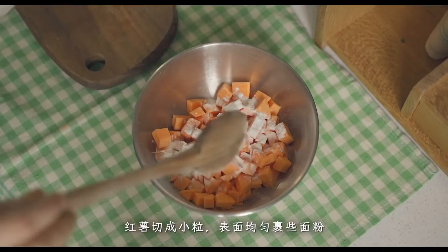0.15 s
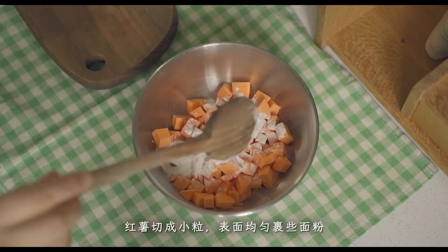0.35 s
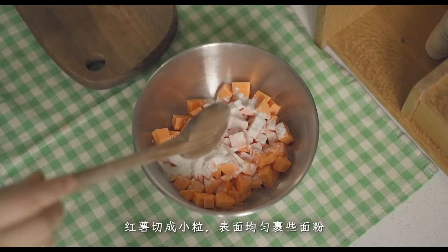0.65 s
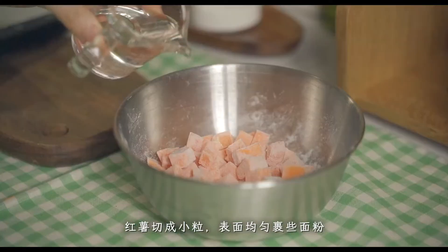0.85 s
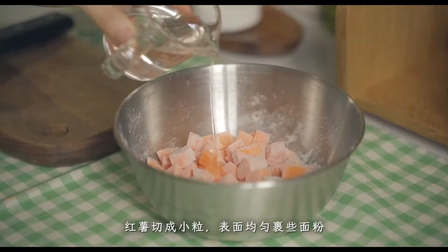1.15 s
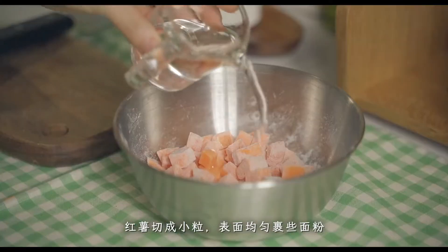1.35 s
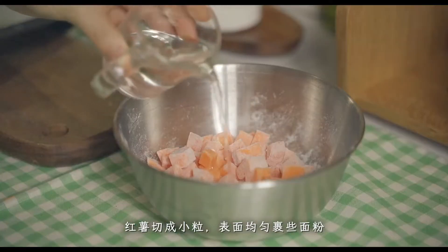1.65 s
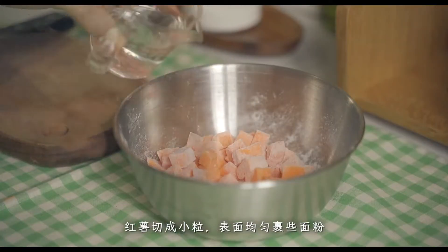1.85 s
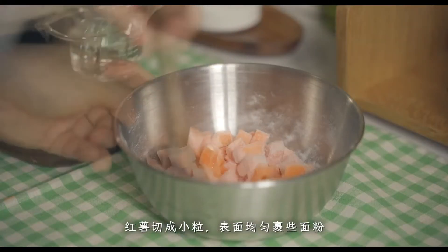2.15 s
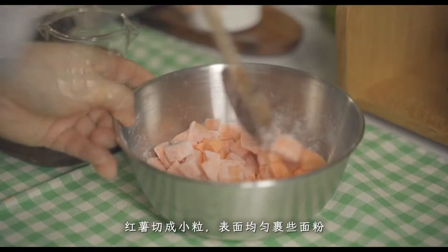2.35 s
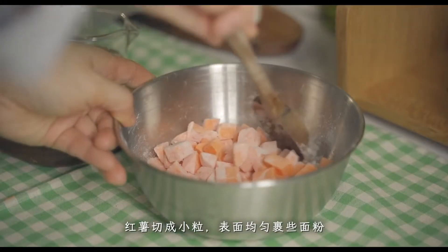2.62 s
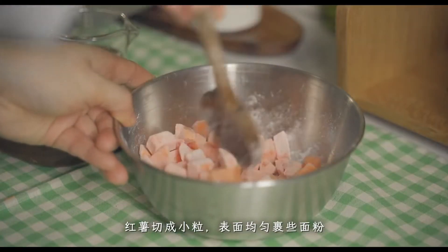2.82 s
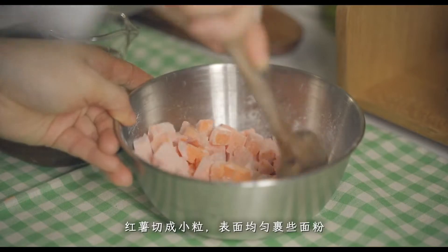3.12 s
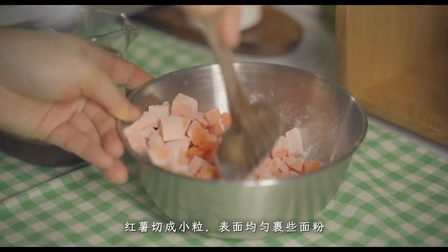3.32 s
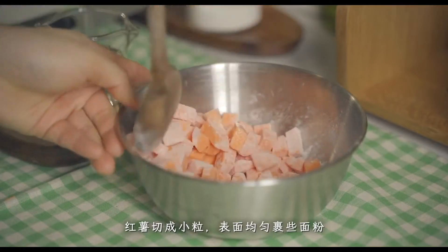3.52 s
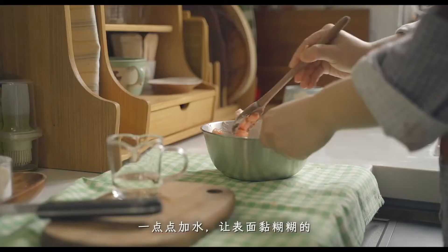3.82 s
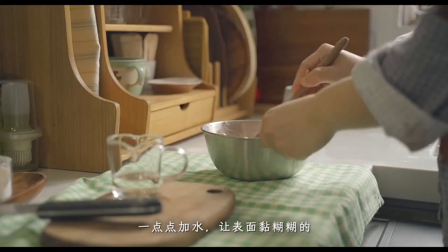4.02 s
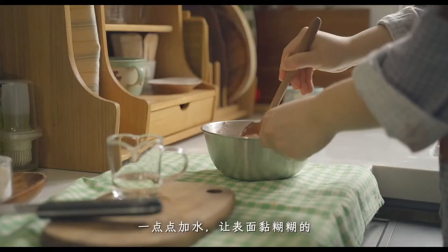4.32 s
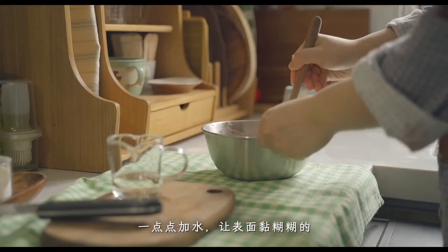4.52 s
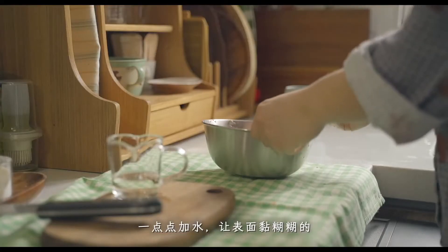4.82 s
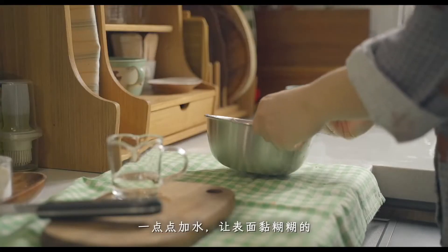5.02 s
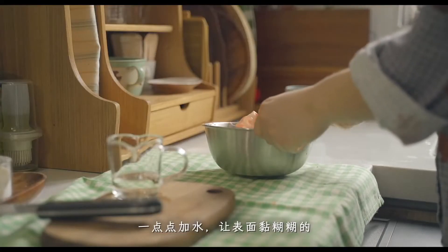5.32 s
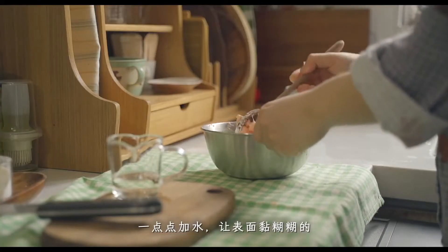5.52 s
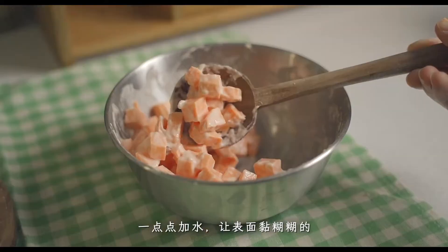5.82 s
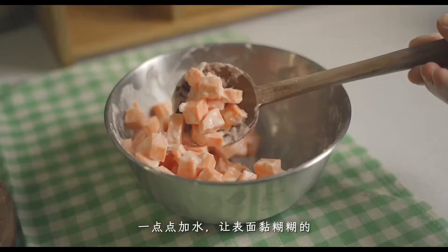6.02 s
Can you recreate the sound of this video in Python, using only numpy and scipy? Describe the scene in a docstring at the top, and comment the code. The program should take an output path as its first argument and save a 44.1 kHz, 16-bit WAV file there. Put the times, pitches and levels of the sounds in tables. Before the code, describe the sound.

In a quiet kitchen, a wooden spoon stirs floured vegetable cubes in a steel bowl, heard up close. Faint rubs and a few wet ticks lead into uneven, hissing scrapes along the metal. The spoon knocks the side hard twice, each time with a short damped ring. The bowl rumbles softly on the table, batter ticks, and a cluster of dull bumps comes near the end.

```python
"""A wooden spoon stirs floured vegetable cubes in a steel bowl, on a cloth in a quiet kitchen.
Each stroke is countless tiny slips that hiss along the wall and make the damped steel sing.
The spoon knocks the bowl hard twice, cubes and spoon bump dully on the bottom, and wet batter ticks.
Underneath, the table rumbles as the bowl is shoved about, over faint room tone."""
import sys
import numpy as np
from scipy import signal
from scipy.fft import rfft, irfft, next_fast_len
from scipy.io import wavfile

SR = 44100
rng = np.random.default_rng(int(sys.argv[2]) if len(sys.argv) > 2 else 0)


def put_to_file(sound):
    """Save the sound as 16-bit audio at rate SR, in the file named by the first command-line argument."""
    columns = np.atleast_2d(sound).T  # one column per channel
    safe = np.clip(columns, -1, 1)
    whole_steps = np.round(safe * 32767)
    wavfile.write(sys.argv[1], SR, whole_steps.astype(np.int16))


N = 271655
SIZE, BLOW_SIZE = next_fast_len(N), 16384  # FFT lengths for the scene and for one blow
T, F = np.arange(N) / SR, np.maximum(np.fft.rfftfreq(SIZE, 1 / SR), 1)
BLOW_T, BLOW_F = np.arange(BLOW_SIZE) / SR, np.maximum(np.fft.rfftfreq(BLOW_SIZE, 1 / SR), 1)


def amp(db):
    """Decibels to gain."""
    return 10 ** (np.asarray(db) / 20)


def noise(size=SIZE):
    """White noise."""
    return rng.standard_normal(size)


def colour(points):
    """EQ curve through (frequency [Hz], gain [dB]) points."""
    hz, db = np.transpose(points)
    return amp(np.interp(np.log(F), np.log(hz), db))


def resonance(hz, width, f=F):
    """Response of one damped resonance, gain 1 at its centre."""
    return 1 / (1 + 1j * (f * f - hz * hz) / (f * width))


def modal(modes, f):
    """Response of a ringing body; neighbouring modes move in opposite phase."""
    return sum((-1) ** k * amp(db) * resonance(hz, width, f) for k, (hz, width, db) in enumerate(modes))


def shaped(x, response):
    """Filter a sound by a frequency response."""
    return irfft(rfft(x, SIZE) * response, SIZE)[:N]


def hiss(response, band_hz=(250, 15000)):
    """Filtered noise with rms 1 inside the band."""
    inside = (F > band_hz[0]) & (F < band_hz[1])
    return shaped(noise(), response) / np.sqrt(np.mean(np.abs(response) ** 2 * inside))


def flutter(rate_hz):
    """Smooth random wobble with a spread near 1."""
    knots = np.arange(0, N / SR + 1, 1 / rate_hz)
    return np.sqrt(3 / 2) * np.interp(T, knots, noise(len(knots)))


def swell(time, half_length):
    """A bell-shaped rise and fall around a time."""
    return np.exp(-((T - time) / half_length) ** 2 / 2)


def fade(t60):
    """Exponential decay of a blow, 60 dB in t60 seconds."""
    return np.exp(-np.log(1000) * BLOW_T / t60)


def unit(x):
    """Scale a blow to the energy of 10 ms at rms 1."""
    return x * np.sqrt(0.01 * SR / np.sum(x ** 2))


def contact(t60, chatter_db):
    """Spectrum of one push followed by dying chatter."""
    push = unit(signal.unit_impulse(BLOW_SIZE))
    chatter = unit(noise(BLOW_SIZE) * fade(t60))
    return rfft(push + amp(chatter_db) * chatter)


def add(track, time, x):
    """Mix a blow into a track at a time in seconds."""
    i = int(time * SR)
    track[i:i + len(x)] += x[:N - i]


# tone of still kitchen air: (frequency [Hz], gain [dB])
AIR_EQ = [(25, -34), (70, -7), (130, -14.5), (200, -19.5), (290, -19.5), (340, -14.5), (420, -21),
          (900, -27.5), (2000, -40), (3700, -46), (4600, -45), (5000, -41.5), (8400, -48), (9600, -43),
          (15500, -45.5)]
# faint steady high tones: (frequency [Hz], relative level [dB])
HIGH_TONES = [(7122, -84), (13873, -97), (14250, -87.5)]
def room_tone(air_db=-63, low_cut_hz=70, tones_db=-2):
    """A bed of low room noise with a faint even hiss and steady tones at 7.1, 13.9 and 14.25 kHz."""
    air = hiss(colour(AIR_EQ) * F / np.hypot(F, low_cut_hz))
    tones = sum(amp(db) * np.sqrt(2) * np.sin(2 * np.pi * hz * T) for hz, db in HIGH_TONES)
    return amp(air_db) * air + amp(tones_db) * tones


# slaps off the worktop, cupboard and shelves: (delay [s], relative level [dB])
REFLECTIONS = [(.0023, -32), (.0083, -18), (.0153, -26)]
# tone of the kitchen's echo: (frequency [Hz], gain [dB])
REVERB_EQ = [(100, 2.5), (400, 0), (1150, 1), (2000, -2.5), (6000, 0), (15000, -4)]
def kitchen(x, early_db, early_t60, late_db, late_t60):
    """The room adds a few close reflections, scattered echoes, then a short diffuse tail."""
    early = noise(BLOW_SIZE) ** 3 * fade(early_t60) * (BLOW_T > 0.004)  # cubing makes sparse spikes
    late = noise(BLOW_SIZE) * fade(late_t60) * (1 - fade(0.057))
    echo = amp(early_db) * early / np.linalg.norm(early) + amp(late_db) * late / np.linalg.norm(late)
    for delay, db in REFLECTIONS:
        add(echo, delay, amp([db]))
    return x + shaped(signal.fftconvolve(x, echo)[:N], colour(REVERB_EQ))


# boom of the table under the cloth: (frequency [Hz], gain [dB])
TABLE_EQ = [(20, -22.5), (40, -7.5), (68, -6.5), (84, -5), (93, 4), (104, -11), (135, -7.5), (180, -16),
            (300, -34), (700, -70)]
# shoves that slide the bowl on its cloth: (time [s], half length [s], level [dB])
BOWL_SHOVES = [(0.744, 0.016, -55), (0.98, 0.091, -53), (1.24, 0.023, -52), (2.256, 0.029, -56),
               (2.457, .03, -50), (2.8, 0.1, -44.5), (3.155, 0.162, -50.5), (3.674, 0.024, -46.5),
               (3.76, 0.088, -50), (4.116, 0.034, -58), (5.23, .04, -55)]
# thumps of the rocking bowl: (time [s], level [dB], pitch [Hz], t60 [s])
ROCKING_THUMPS = [(2.702, -41, 88, 0.21), (3.626, -37, 99, 0.063), (3.079, -38, 135, .07),
                  (4.374, -38.5, 230, 0.091)]
def table_rumble(resting_db=-62, wander_db=1.8):
    """The table rumbles softly, more as the bowl is shoved about, and thumps when the bowl rocks."""
    resting = amp(resting_db + wander_db * flutter(rate_hz=7.7))
    shove_power = sum((amp(db) * swell(time, half)) ** 2 for time, half, db in BOWL_SHOVES)
    out = np.sqrt(resting ** 2 + shove_power) * hiss(colour(TABLE_EQ), band_hz=(50, 170))
    for time, db, hz, t60 in ROCKING_THUMPS:
        thump = np.sin(2 * np.pi * hz * BLOW_T) * fade(t60) * (1 - fade(0.027))
        add(out, time, amp(db) * unit(thump))
    return out


# sticky ticks of drops and batter, plus one small dull bump at 2.58 s: (time [s], level [dB], pitch [Hz], t60
# [s])
BATTER_TICKS = [(1.5862, -61, 12000, 0.0059), (1.7585, -70, 12000, .012), (1.9434, -48, 9500, 0.01),
                (1.943, -63, 3280, 0.066), (2.581, -57.5, 1640, 0.027), (3.502, -49, 9350, 0.1),
                (4.059, -53.5, 11800, 0.018), (4.616, -50, 12600, .04), (4.712, -50.5, 4770, 0.06),
                (4.8387, -53.5, 7600, 0.037), (5.119, -51, 4810, 0.072), (5.556, -58.5, 3900, 0.012),
                (5.556, -61, 10300, 0.087)]
def batter_ticks(relative_width=0.57):
    """Wet surfaces meet or part in a brief bright crackle."""
    out = np.zeros(N)
    for time, db, hz, t60 in BATTER_TICKS:
        crackle = contact(t60, chatter_db=12) * resonance(hz, relative_width * hz, BLOW_F) ** 2
        add(out, time, amp(db) * unit(irfft(crackle)))
    return out


# ring of the loaded steel bowl: (frequency [Hz], width [Hz], gain [dB])
STEEL_MODES = [(184, 22, -15.5), (347.5, 12, -9.5), (400.4, 7.7, -2.5), (479, 73, -6.5), (607, 68, -4.5),
               (729, 74.2, -2.5), (816, 45, -2), (953.4, 28, 2.5), (1101, 63, 4.5), (1232, 150, -1.5),
               (1406, 33, 0.5), (1702, 64, 2), (1843, 62, 3), (2088, 200, -8.5), (2790, 390, -15),
               (3840, 240, -19.5), (4370, 280, -19), (7640, 240, -9), (8390, 690, -17.5), (9640, 440, -10),
               (10900, 1000, -15), (12230, 900, -18), (13920, 1182, -25)]
def bowl(f):
    """Response of the steel, damped by its load; bumps, knocks and strokes all drive it."""
    return modal(STEEL_MODES, f)


# dull body of the spoon and thickly covered bottom: (frequency [Hz], width [Hz], gain [dB])
BOTTOM_MODES = [(280, 93, -3), (604, 170, -4.5), (745, 110, 0.5), (990, 180, -2.5), (1120, 130, -1),
                (2000, 220, -11), (2750, 400, -22.5)]
# spoon and cubes landing on the bottom: (time [s], level [dB], pitch [Hz])
BOTTOM_BUMPS = [(2.86, -48.5, 1060), (2.909, -50.5, 676), (2.97, -51, 1590), (3.048, -55.5, 950),
                (3.478, -54, 900), (3.621, -55, 1500), (4.309, -51, 440), (5.413, -55.5, 756),
                (5.4468, -40.5, 770), (5.554, -36, 1080), (5.5796, -27.5, 1090), (5.6335, -42, 990),
                (5.681, -51.5, 1000)]
def bottom_bumps(relative_width=0.7, steel_db=-21, soft_hz=1800, slap_s=0.009, slap_db=-10):
    """A soft contact rings the covered bottom and barely wakes the steel; a weaker copy slaps back off a nearby
    surface 9 ms later."""
    out = np.zeros(N)
    bottom = modal(BOTTOM_MODES, BLOW_F)
    for time, db, hz in BOTTOM_BUMPS:
        push = contact(t60=0.014, chatter_db=-4.5) / (1 + 1j * BLOW_F / soft_hz) ** 3
        body = unit(irfft(push * bottom * resonance(hz, relative_width * hz, BLOW_F)))
        steel = unit(irfft(push * bowl(BLOW_F)))
        bump = amp(db) * (body + amp(steel_db) * steel)
        add(out, time, bump)
        add(out, time + slap_s, amp(slap_db) * bump)
    return out


# bite of wood cracking on thin steel: (frequency [Hz], gain [dB])
CRACK_EQ = [(100, -32), (300, -13), (1200, 4.5), (2400, -7.5), (3800, -5.5), (6000, -12.5), (7800, -7.5),
            (12500, -11), (15000, -18.5)]
# two hard knocks on the wall and a faint one: (time [s], level [dB], wood pitch [Hz], wood t60 [s],
# ring mix [dB], crack mix [dB], crack roll-off [Hz], thud mix [dB], thud pitch [Hz])
WALL_KNOCKS = [(3.0789, -16.5, 1754, 0.012, -1.5, -19, 16250, -9, 404),
               (4.3742, -23, 1486, 0.0024, 2, 1, 8070, -0.5, 500),
               (5.205, -53.5, 1120, 0.039, 4, 6.5, 1500, -9.5, 429)]
def spoon_knocks(thud_relative_width=0.83, ring_brightness=1.647):
    """The spoon strikes: a short wooden clack, ringing steel, a bright crack and the load's thud."""
    out = np.zeros(N)
    for time, db, hz, t60, ring_db, crack_db, top_hz, thud_db, thud_hz in WALL_KNOCKS:
        clack = unit(np.sin(2 * np.pi * hz * BLOW_T) * fade(t60) * (1 - fade(0.0034)) ** 2)
        steel = bowl(BLOW_F) / (1 + 1j * BLOW_F / (ring_brightness * top_hz))
        ring = unit(irfft(contact(t60=0.063, chatter_db=-6.5) * steel))
        crack_noise = shaped(noise(), colour(CRACK_EQ) / (1 + 1j * F / top_hz))[:BLOW_SIZE]
        crack = unit(crack_noise * fade(0.02) * (1 - fade(0.004)))
        load = resonance(thud_hz, thud_relative_width * thud_hz, BLOW_F) ** 2
        thud = unit(irfft(contact(t60=0.053, chatter_db=-6.5) * load))
        knock = clack + amp(ring_db) * ring + amp(crack_db) * crack + amp(thud_db) * thud
        add(out, time, amp(db) * knock)
    return out


# rasps of the dragging spoon: (time [s], half length [s], level [dB], pitch [Hz], mode width [Hz])
SPOON_CATCHES = [(0.362, 0.02, -70, 4300, 220), (0.363, 0.015, -70.5, 11000, 9000),
                 (0.463, 0.049, -81, 2860, 500), (0.58, 0.0095, -76, 7500, 3000),
                 (2.145, 0.068, -62, 2560, 200), (2.192, 0.038, -59.5, 1940, 700),
                 (2.342, 0.047, -61.5, 3700, 1300), (3.262, 0.024, -42, 1797, 109),
                 (3.27, 0.019, -52, 3140, 505), (4.12, 0.025, -53, 1110, 143),
                 (4.924, 0.13, -65, 2070, 1326), (4.944, 0.085, -60.5, 3900, 1200),
                 (5.435, 0.012, -67.5, 3200, 2500)]
def spoon_catches():
    """Brief rough tones as friction feeds a single resonance."""
    return sum(amp(db) * swell(time, half) * hiss(resonance(hz, width) ** 2)
               for time, half, db, hz, width in SPOON_CATCHES)


def sheen(t60, db):
    """Fine spectral ripple from the countless narrow modes of thin steel."""
    ring = noise(BLOW_SIZE) * fade(t60)
    return 1 + amp(db) * rfft(ring / np.linalg.norm(ring), SIZE)


def pressure(start, attack, hold, release_t60, curve):
    """The spoon leans in gradually, keeps its pressure, then lets go."""
    leaning = np.clip((T - start) / attack, 0, 1) ** curve
    since_release = np.maximum(T - start - attack - hold, 0)
    return leaning * np.exp(-np.log(1000) * since_release / release_t60)


# tone of wood rubbing on floury steel: (frequency [Hz], gain [dB])
RUB_EQ = [(200, 0.5), (500, -3.5), (1400, -5), (2300, 1), (3000, -1), (4300, 0.5), (5300, -1), (7000, -1.5),
          (10500, -10), (14000, -15), (16000, -10)]
# strokes along the wall: (start [s], attack [s], hold [s], release t60 [s],
# rub gain [dB], singing wall gain [dB], droning body gain [dB], treble shelf [dB])
SPOON_STROKES = [(1.82, 0.34, 0.02, 0.37, -70, -48.5, -67, 6),
                 (2.12, 0.18, 0.097, 0.24, -64.5, -68, -64.5, 12.5),
                 (2.623, 0.049, 0.17, 0.9, -74, -74.5, -63.5, 10),
                 (2.713, .12, 0.023, 0.17, -47, -46.5, -55, 11),
                 (3.041, 0.18, 0.093, 0.5, -53.5, -44, -45.5, 13.5),
                 (3.583, 0.08, 0.19, 0.02, -57.5, -49.5, -60.5, 12.5),
                 (3.967, 0.084, .11, .35, -60.5, -62, -57, 2.5),
                 (4.379, .14, 0.15, 1, -60, -57.5, -59.5, 4),
                 (5.172, 0.052, 0.021, 0.5, -70, -60, -55, -14)]
def stirring(rub_db=-1, body_db=-3, peak_contrast=0.8, crossover_hz=2300, shelf_hz=11500):
    """Countless tiny slips hiss directly and drive the bowl's high wall modes and low body modes."""
    steel = np.abs(bowl(F)) ** peak_contrast  # the pressing spoon damps the bowl and flattens its peaks
    lows = 1 / (1 + (F / crossover_hz) ** 4)
    rub_tone = colour(RUB_EQ) * sheen(t60=0.034, db=-5.5)
    rubbing = amp(rub_db) * hiss(rub_tone, band_hz=(5000, 7000))
    wall_tone = steel * (1 - lows) ** 2 * sheen(t60=0.097, db=-0.5)
    singing = hiss(wall_tone, band_hz=(7300, 13000))
    body_tone = steel * lows * colour([(300, 2.5), (700, -14), (1100, -9), (2000, -11.5)])
    droning = amp(body_db) * hiss(body_tone, band_hz=(900, 2200))
    # the grip of wood on floury steel varies from moment to moment, and more slowly as cubes snag
    grip = amp(0.98 * flutter(rate_hz=700) + 1.03 * flutter(rate_hz=120) + 1.46 * flutter(rate_hz=24.99))
    out, treble = np.zeros((2, N))
    for *timing, scrape_db, sing_db, drone_db, shelf_db in SPOON_STROKES:
        # the steel answers to a light touch; the dry hiss needs more pressure
        scrape = pressure(*timing, curve=2.6) * amp(scrape_db) * rubbing
        ring = pressure(*timing, curve=2.47) * (amp(sing_db) * singing + amp(drone_db) * droning)
        stroke = grip * (scrape + ring)
        out += stroke
        treble += (amp(shelf_db) - 1) * stroke
    return out + shaped(treble, 1 / (1 + (shelf_hz / F) ** 8))


def scene():
    """Close mono mix: knocks, ticks and bumps get the kitchen's echo; the stirring stays dry."""
    hits = spoon_knocks() + batter_ticks()
    sharp = kitchen(hits, early_db=-6, early_t60=0.047, late_db=-6.5, late_t60=0.25)
    dull = kitchen(bottom_bumps(), early_db=-10.5, early_t60=0.08, late_db=-5, late_t60=0.21)
    return (sharp + dull + stirring() + spoon_catches() + table_rumble() + room_tone())[None]


def record(dry):
    """A steep high cut at 15.7 kHz."""
    return signal.sosfiltfilt(signal.ellip(10, 0.05, 60, 15700, fs=SR, output="sos"), dry)


dry = scene()
out = record(dry)
put_to_file(out)
```